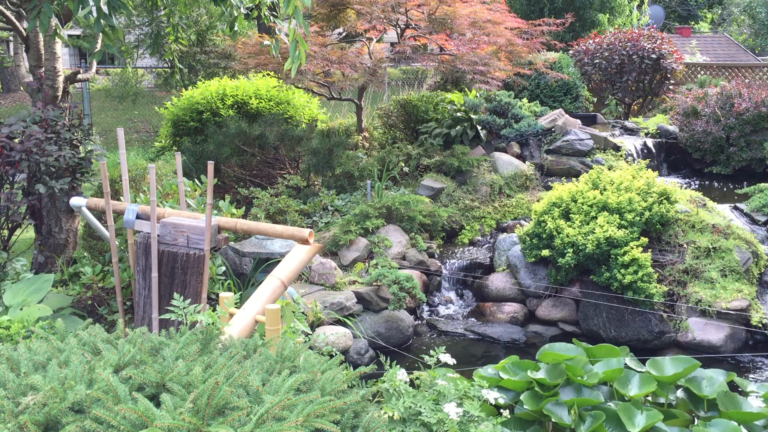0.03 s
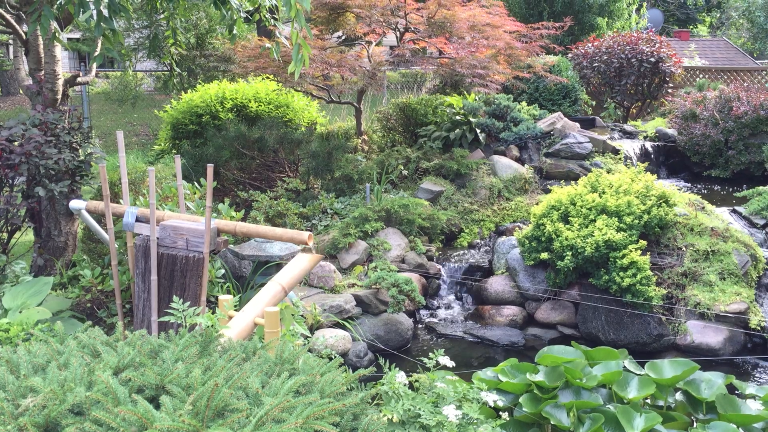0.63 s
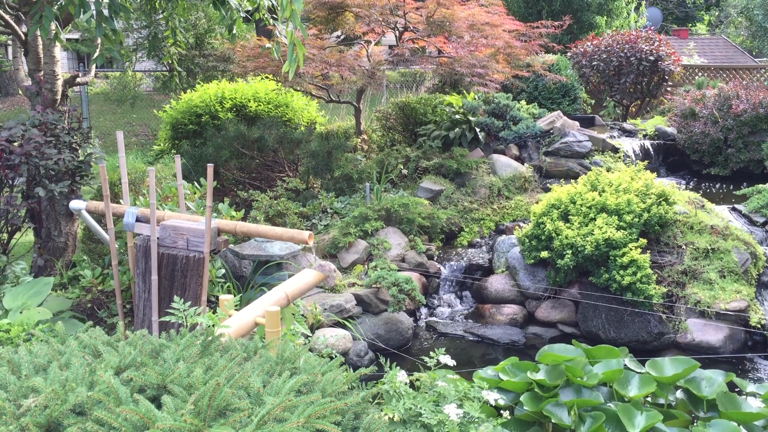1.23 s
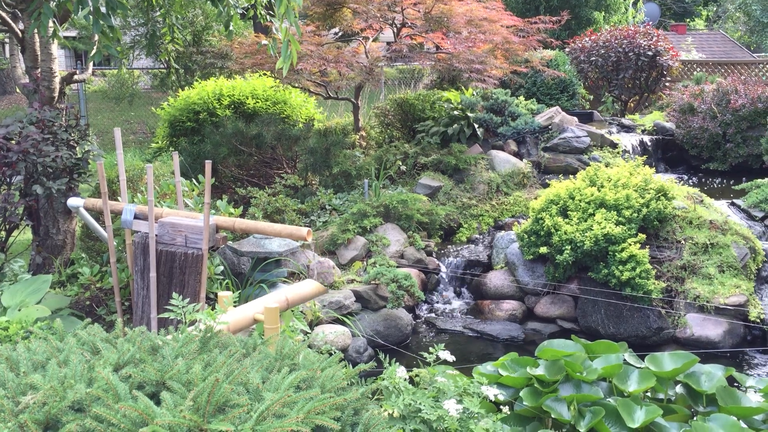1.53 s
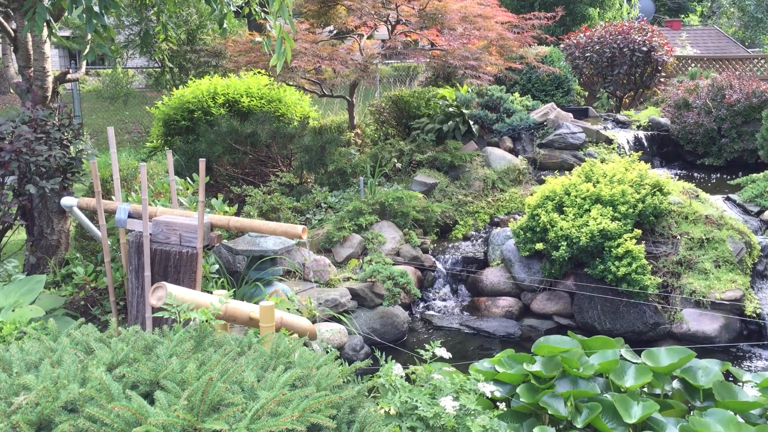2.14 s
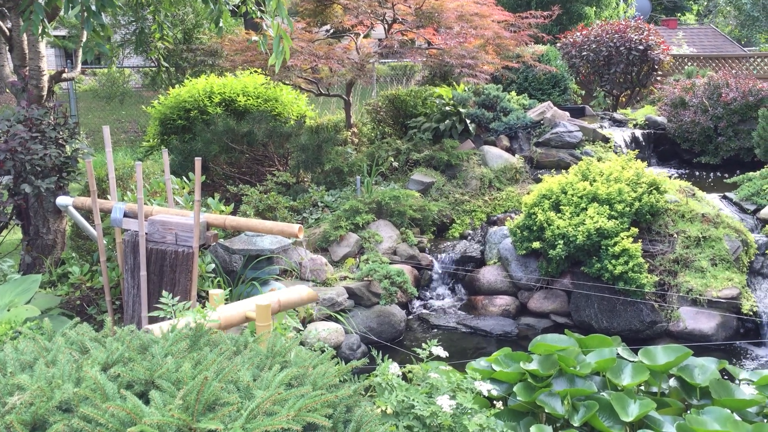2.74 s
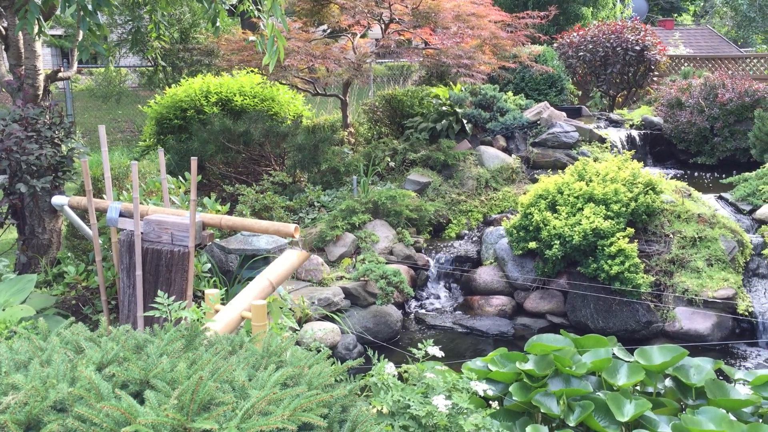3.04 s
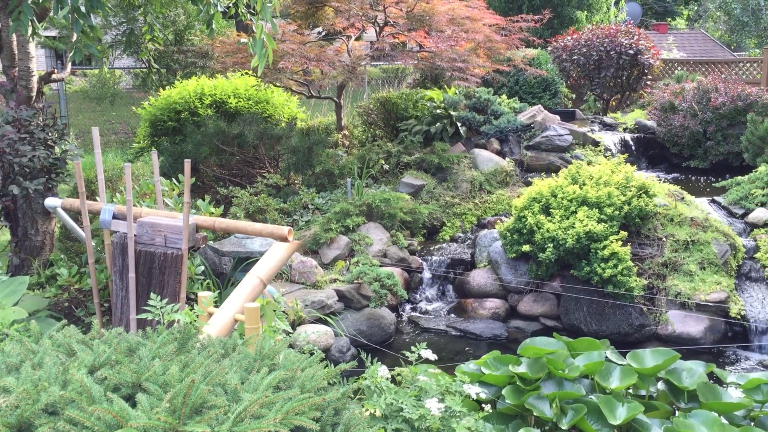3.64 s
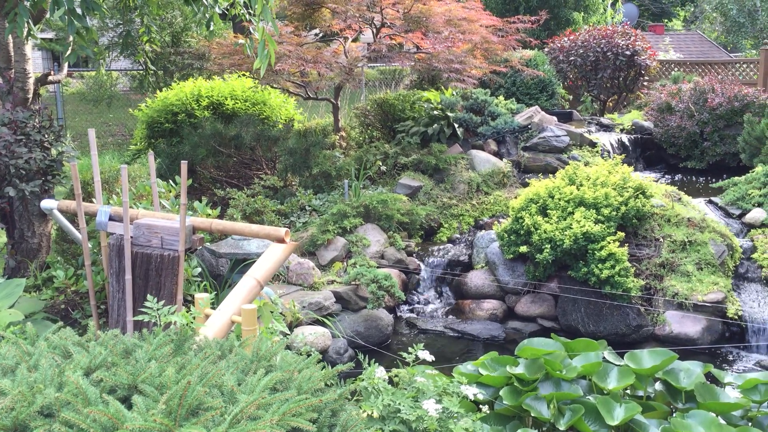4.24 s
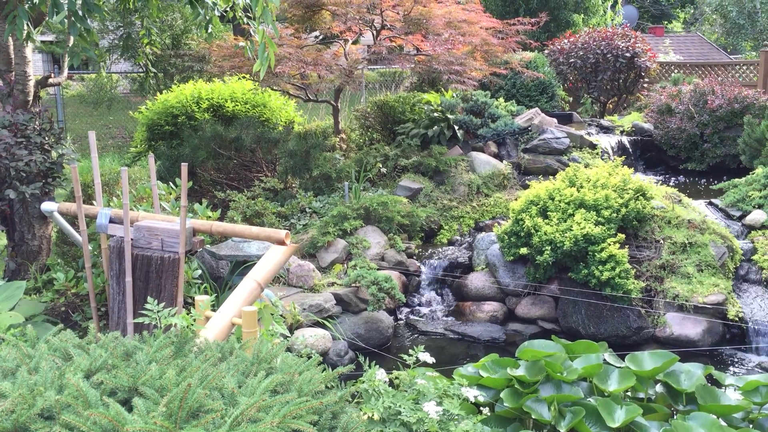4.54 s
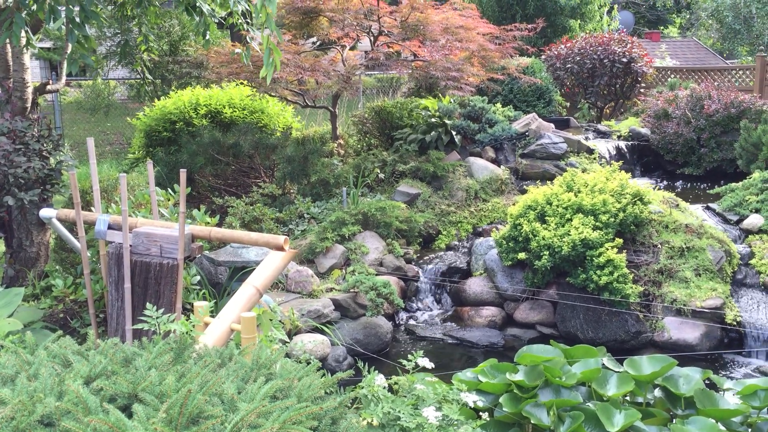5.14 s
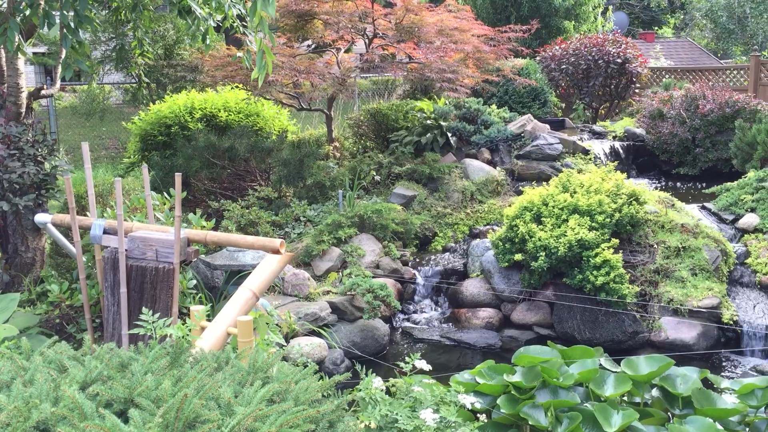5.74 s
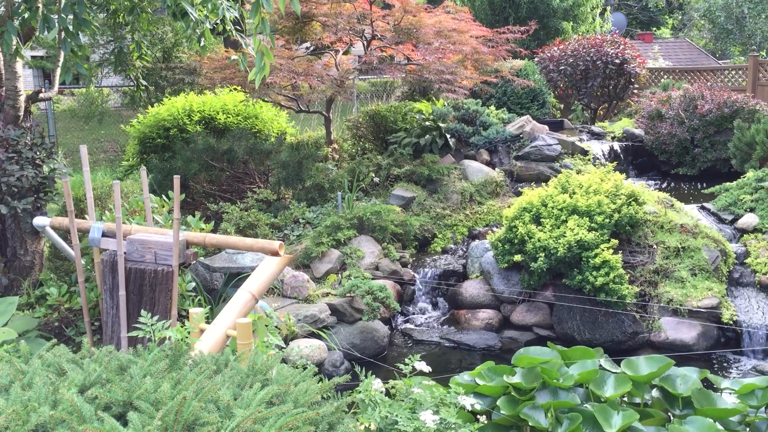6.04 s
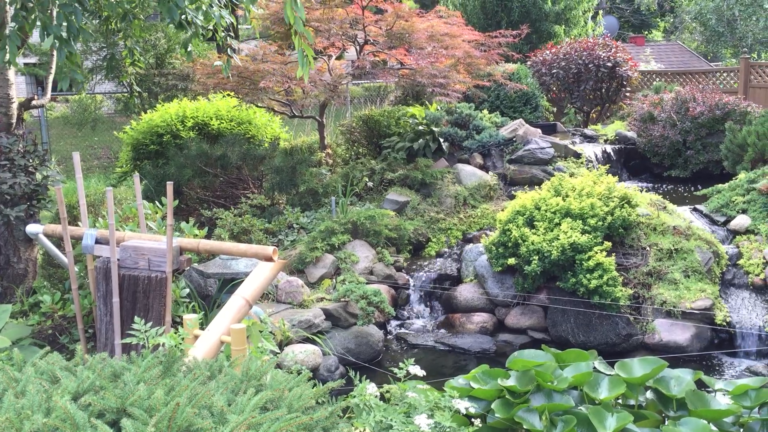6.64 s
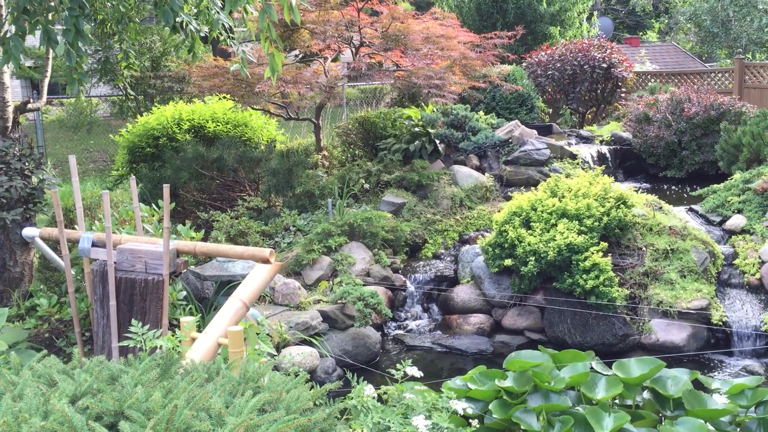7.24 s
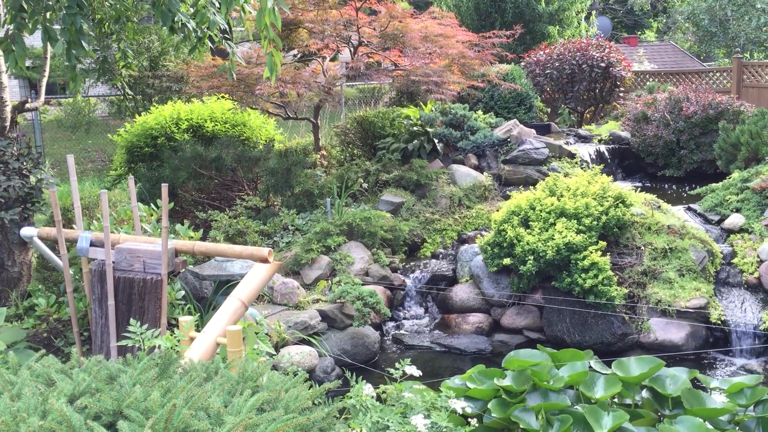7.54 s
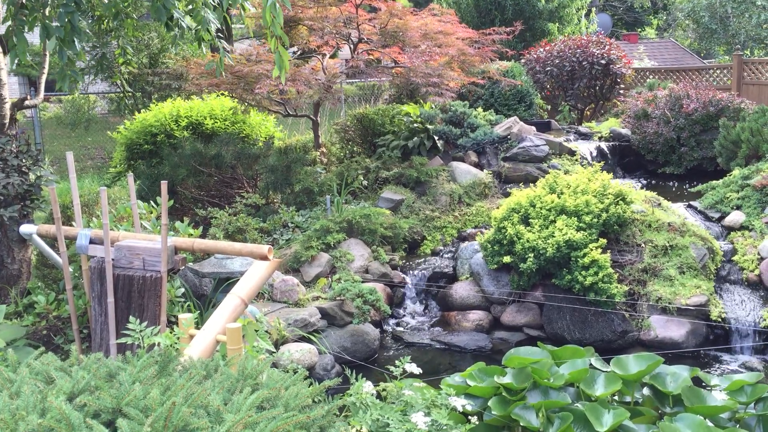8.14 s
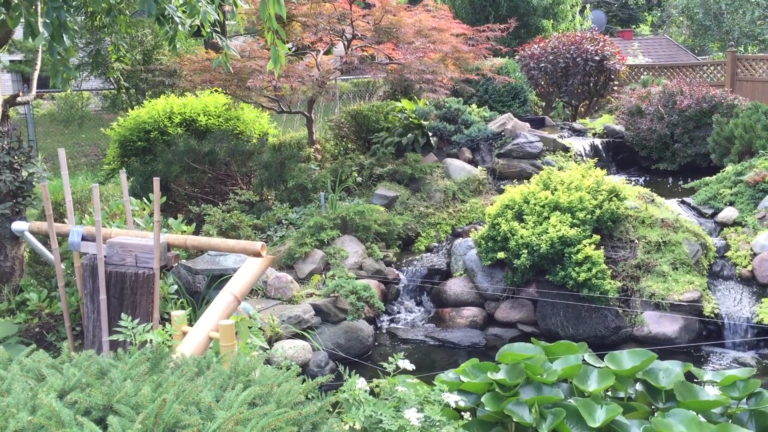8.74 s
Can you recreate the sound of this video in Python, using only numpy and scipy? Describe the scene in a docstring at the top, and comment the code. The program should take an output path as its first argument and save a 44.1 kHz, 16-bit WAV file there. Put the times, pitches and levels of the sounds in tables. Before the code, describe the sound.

A bamboo water tipper knocks sharply and bounces once, while cicadas buzz in pulses over a small garden waterfall.

```python
"""A small garden waterfall rushes and bubbles throughout, over the drone of a distant engine.
From the start cicadas buzz in the trees in pulsing phrases, each ending in a drawn-out whine.
At 3.25 s a bamboo water tipper knocks on its rest; it bounces once, 0.5 s later, with faint echoes
from rocks and fence. Meanwhile a far vehicle pulls away. From about 6.5 s a thin insect trill swells."""
import sys
import numpy as np
from scipy import signal
from scipy.fft import rfft, irfft
from scipy.io import wavfile

SR = 44100
rng = np.random.default_rng(int(sys.argv[2]) if len(sys.argv) > 2 else 0)


def to_wav(sig):
    """Store sig (one row per channel, or 1-D mono) as 16-bit WAV at the path in sys.argv[1].

    Samples outside -1..1 are clipped; the rate is SR.
    """
    pcm = np.clip(np.atleast_2d(sig), -1, 1) * 32767
    pcm = np.round(pcm).astype(np.int16)
    wavfile.write(sys.argv[1], SR, pcm.T)  # frames by channels


N = 396900
TIME = np.arange(N) / SR
# near cicada, buzz drops into whine: t/s, whine level/dB
NEAR_CICADA_PHRASES = [(0.53, -41), (1.465, -42), (2.383, -41), (3.29, -44.5), (4.181, -44), (5.085, -44.5),
                       (5.94, -45), (6.807, -45.5), (7.669, -42.5), (8.51, -46)]


def undb(db):
    """Decibels to gain."""
    return 10 ** (np.asarray(db) / 20)


def unit(x):
    """Scale to rms 1."""
    return x / np.sqrt(np.mean(x ** 2))


def colour(x, points):
    """Filter by a spectrum of (f/Hz, gain/dB) points."""
    hz, db = np.transpose(points)
    bins_hz = np.maximum(np.fft.rfftfreq(len(x), 1 / SR), 1)
    gain = undb(np.interp(np.log(bins_hz), np.log(hz), db))
    return irfft(rfft(x) * gain, len(x))


def walk(rate_hz):
    """Smooth random signal, rms 1, bandwidth about rate_hz."""
    lowpass = np.exp(-(np.fft.rfftfreq(N, 1 / SR) / rate_hz) ** 2)
    return unit(irfft(rfft(rng.standard_normal(N)) * lowpass, N))


def fade(t, t60_s):
    """Exponential decay, 60 dB in t60_s."""
    return np.exp(-np.log(1000) * t / t60_s)


def add(out, at_s, sound):
    """Mix sound into out at at_s."""
    i = max(int(at_s * SR), 0)
    out[i:i + len(sound)] += sound[:max(N - i, 0)]


def tone(hz, width_hz, rough):
    """Partial of rms 1; its rough share is smeared into a narrow band."""
    phase = 2 * np.pi * np.cumsum(hz * np.ones(N)) / SR
    in_phase = 1 - rough + rough * walk(width_hz)
    quadrature = rough * walk(width_hz)
    return unit(in_phase * np.sin(phase) + quadrature * np.cos(phase))


def tipper(crack_db=-7, attack_s=.0012):
    """Each blow rings the bamboo once and cracks at every touch of its chatter; a slower blow is duller."""
    # blows on the rest: t/s, level/dB, contact cut-off/Hz
    knocks = [(3.2549, -11, 4500), (3.7570, -23.5, 1000)]
    # touches within a blow: delay/s, level/dB
    contacts = [(0, -4), (.0034, 2.5), (0.0094, -5), (.0140, -9)]
    # modes of tube and air column: f/Hz, level/dB, t60/s
    tube_modes = [(250, -15, .025), (391, -18.5, .28), (570, -3.5, .036), (609, -13, .26), (700, -6, .022),
                  (790, -2, .025), (865, -2, .022), (960, -5, .028), (1150, -11, .035), (1218, -4, .058),
                  (1715, -3.5, .04), (2070, -14, .035), (2290, -10, .03), (2540, -13, .03),
                  (3830, -16, .03), (6100, -14, .02)]
    # contact crack: f/Hz, level/dB
    crack_spectrum = [(120, -34), (250, -15), (450, -20), (850, 4), (1400, -4), (2400, -3), (3200, -11),
                      (6200, -11), (9000, -17), (15000, -17)]
    out, t = np.zeros(N), TIME[:SR // 2]
    # neighbouring modes oppose each other, so the knock builds over a few ms
    ring = sum((-1) ** k * undb(db) * np.sin(2 * np.pi * hz * t) * fade(t, t60_s)
               for k, (hz, db, t60_s) in enumerate(tube_modes))
    chatter = sum(undb(db) * (t >= delay_s) * fade(np.abs(t - delay_s), .021) for delay_s, db in contacts)
    for at_s, db, cutoff_hz in knocks:
        crack = unit(colour(rng.standard_normal(len(t)), crack_spectrum)) * chatter
        blow = (ring + undb(crack_db) * crack) * (1 - np.exp(-t / attack_s))
        add(out, at_s, undb(db) * signal.lfilter(*signal.butter(1, cutoff_hz, fs=SR), blow))
    return garden(out, wet_db=-15.5, t60_s=.29, fence_s=.054, fence_db=-24)


def bubble(hz, cycles, glide):
    """A ringing air pocket; its pitch rises as it nears the surface."""
    life_s = cycles / hz
    t = TIME[:int(life_s * SR) + 2]
    phase = 2 * np.pi * hz * t * (1 + glide * t / life_s / 2)
    return np.sin(phase) * fade(t, life_s) * (1 - np.exp(-t * hz))


def babble(count, low_hz, high_hz, cycles, spread_db):
    """Swarm of bubbles of all sizes, a few much louder than the rest."""
    out = np.zeros(N)
    for when, pitch, loud, life in rng.random((count, 4)):
        hz = low_hz * (high_hz / low_hz) ** pitch
        gain = undb(-spread_db * np.log(1 - .985 * loud)) * hz / low_hz
        add(out, when * N / SR, gain * bubble(hz, cycles * (.5 + life), glide=.11))
    return unit(out)


def waterfall(rush_db=-46, babble_db=-48, spray_db=-64, spray_db_per_s=.3, drop_trim_db=-5.5):
    """Rushing water, bubbles in the pool below, spurts of spray ticking on the stones."""
    # falling water: f/Hz, level/dB
    water_spectrum = [(110, 0.5), (170, 0.5), (260, 2.5), (340, -5), (430, -10.5), (520, -9.5), (650, -1),
                      (950, -7), (1250, -1.5), (1700, -6), (2250, -6.5), (2800, -4), (10000, -16),
                      (15500, -24.5)]
    # loudest pool bubbles: t/s, level/dB, f/Hz
    plops = [(0.593, -32, 2270), (1.733, -28, 1200), (2.185, -29, 1420), (2.368, -32, 646),
             (2.583, -30, 1230), (4.761, -25, 2256), (5.442, -28, 1480), (6.446, -30, 2220),
             (8.162, -32.5, 936)]
    # loudest drops on stone: t/s, level/dB
    stone_drops = [(3.8271, -28), (4.1089, -27), (7.5656, -32), (8.1872, -31), (8.2835, -34), (8.8936, -31)]
    rush = unit(colour(rng.standard_normal(N), water_spectrum)) * undb(.9 * walk(17))
    pool = babble(count=7000, low_hz=190, high_hz=2587, cycles=24.5, spread_db=2.5)
    pool = unit(colour(pool, water_spectrum))
    ticks = babble(count=3600, low_hz=7000, high_hz=15500, cycles=16, spread_db=1.9)
    ticks = colour(ticks, [(7000, -3), (10000, -5), (12000, 0), (15000, -7)])
    spray = unit(ticks * undb(2 * walk(18)))
    splash = undb(babble_db) * pool + undb(spray_db + spray_db_per_s * TIME) * spray
    for at_s, db, hz in plops:
        add(splash, at_s, undb(db) * bubble(hz, cycles=36, glide=.071))
    for at_s, db in stone_drops:
        slap = np.diff(rng.standard_normal(SR // 100 + 1)) / 2
        add(splash, at_s, undb(db + drop_trim_db) * slap * fade(TIME[:len(slap)], .0084))
    return undb(rush_db) * rush + garden(splash, wet_db=-10, t60_s=.11, fence_s=.049, fence_db=-23)


def cicada_chorus(start_db=-37.7, rise_db_per_s=.09, flicker_db=.5, wander_db=.2):
    """Many far cicadas blur into a sizzling band; two groups flicker independently."""
    # chorus band: f/Hz, level/dB
    chorus_spectrum = [(2750, -28.5), (3100, -4.5), (3500, -2), (3900, 0.5), (4100, 0), (4450, 1.5),
                       (4950, -2), (5550, -1.5), (6200, -6), (7000, -13), (7600, -16), (7800, -14),
                       (8300, -21), (10300, -33)]
    groups = sum(colour(rng.standard_normal(N), chorus_spectrum) * undb(flicker_db * walk(21))
                 for _ in range(2))
    # swells into each near whine, slackens, recovers
    swell_db = sum(np.interp(TIME - at_s, [-.13, 0, .16, .28], [0, 1.3, -.9, 0])
                   for at_s, _ in NEAR_CICADA_PHRASES)
    return unit(groups) * undb(start_db + rise_db_per_s * TIME + swell_db + wander_db * walk(4))


def near_buzz(level_db=-43, upper_hz=4600, lower_hz=3890, lower_db=-6, sag_hz=280):
    """Before each whine the near cicada's buzz swells in two body resonances, then sags and dies down."""
    effort, sag = np.zeros(N), np.zeros(N)
    for at_s, _ in NEAR_CICADA_PHRASES:
        effort += np.interp(TIME - at_s, [-.64, -.63, -.0062, .11], [.013, .28, .86, .0057])
        sag += np.interp(TIME - at_s, [-.04, .05, .2], [0, 1, 0])
    upper = tone(upper_hz - sag_hz * sag, width_hz=95, rough=1)
    lower = tone(lower_hz - sag_hz * sag, width_hz=100, rough=1)
    return undb(level_db) * effort * (upper + undb(lower_db) * lower)


def whine(phrases, partials, length_s, rough, upper_db=0, pitch=1):
    """Tymbals fall into an even beat: clean partials stand out in turn and linger."""
    out, rows = np.zeros(N), np.array(phrases)
    nearest = np.searchsorted((rows[1:, 0] + rows[:-1, 0]) / 2, TIME)
    at_s, db = rows[nearest].T
    progress = (TIME - at_s) / length_s
    for k, (hz, partial_db, entry, end) in enumerate(partials):
        arc = np.clip((progress - entry) / (end - entry), 0, 1)
        swell = np.sqrt(np.abs(np.sin(np.pi * arc ** .5)))
        gain = undb(db + partial_db + upper_db * (k > 0))
        out += gain * swell * tone(hz * pitch, width_hz=21, rough=rough)
    return out


def near_whine(shrink_s_per_s=.009, upper_db_per_s=.55):
    """As the near cicada sings on, its whines get shorter, brighter and slightly higher."""
    # whine partials: f/Hz, level/dB, entry/length, end/length
    near_partials = [(3438, -1, .07, 1), (3608, -11, .1, 1), (3978, -1, .14, 1), (4160, -1.5, .05, .9),
                     (4328, -1, -.08, .5), (5058, -9, .1, .75), (5412, -5.5, .05, .65),
                     (5768, -8.5, .05, .55)]
    length_s = .265 - shrink_s_per_s * TIME
    upper_db = -1 + upper_db_per_s * TIME
    creep = np.interp(TIME, [2.5, 5.5], [1, 1.007])
    return whine(NEAR_CICADA_PHRASES, near_partials, length_s, rough=.18, upper_db=upper_db, pitch=creep)


def far_whine():
    """A lower cicada, further off, whines at its own pace."""
    # whines: t/s, level/dB
    far_phrases = [(-.02, -48), (1.14, -43.5), (2.31, -46), (3.57, -47.5), (5.18, -50.5)]
    # whine partials: f/Hz, level/dB, entry/length, end/length
    far_partials = [(2921, -4.5, .35, 1), (3070, -1, .1, .7), (3150, -6, .6, 1.1), (3342, -1, .05, .65)]
    return whine(far_phrases, far_partials, length_s=.23, rough=.3)


def insect_trill(trill_hz=5560, octave_db=-16, sizzle_db=-4):
    """Thin, narrow rasp with its octave and a wide sizzle."""
    # trill loudness: t/s, level/dB
    trill_levels = [(0, -78), (6.4, -72), (6.8, -53), (7.15, -64), (7.6, -48), (8, -45), (8.25, -55),
                    (8.55, -48), (9, -44)]
    level_db = np.interp(TIME, *np.transpose(trill_levels))
    sizzle = unit(colour(rng.standard_normal(N), [(4000, -32), (5800, 7), (9000, -5), (15000, -21)]))
    rasp = tone(trill_hz, width_hz=140, rough=1)
    octave = tone(2 * trill_hz, width_hz=650, rough=1)
    return undb(level_db) * (rasp + undb(octave_db) * octave + undb(sizzle_db) * sizzle)


def engine(lines_db=-3, rumble_db=-4, wander_db=1.3):
    """Only wavering low lines and a rumble carry this far; they fade and return on the way."""
    # engine lines: f/Hz, level/dB
    engine_lines = [(76, 0.5), (94, -6.5), (119, -11.5), (154, -10.5), (205, -11)]
    # rumble: f/Hz, level/dB
    rumble_spectrum = [(20, -34), (35, -41), (55, 8.5), (78, 9.5), (100, 8.5), (140, 4.5), (220, -49)]
    # engine loudness: t/s, level/dB
    engine_levels = [(0, -49), (2.2, -50), (3.2, -52), (4.7, -49), (6.2, -48), (9, -49)]
    speed = 1 + .00806 * walk(.596)
    lines = sum(undb(db) * tone(hz * speed, width_hz=4.9, rough=.36) for hz, db in engine_lines)
    rumble = unit(colour(rng.standard_normal(N), rumble_spectrum))
    level_db = np.interp(TIME, *np.transpose(engine_levels)) + wander_db * walk(9)
    return undb(level_db) * (undb(lines_db) * lines + undb(rumble_db) * rumble)


def vehicle():
    """A faint motor note climbs as a distant vehicle pulls away."""
    # motor note: t/s, f/Hz, level/dB
    motor_track = [(3, 269, -80), (3.5, 278.7, -59), (4.3, 292, -59), (5, 298, -66), (5.6, 302, -80)]
    at_s, hz, db = np.transpose(motor_track)
    return undb(np.interp(TIME, at_s, db)) * tone(np.interp(TIME, at_s, hz), width_hz=3.2, rough=.42)


def garden(x, wet_db, t60_s, fence_s, fence_db):
    """Direct sound, scatter from rocks and shrubs, a later echo from the fence."""
    t = TIME[:SR // 2]
    scatter = colour(rng.standard_normal(len(t)), [(300, -5.5), (900, -2.5), (2500, -1.5), (9000, -6.5)])
    scatter *= fade(t, t60_s) * np.minimum(t / .0076, 1)
    out = x + undb(wet_db) * signal.fftconvolve(x, scatter / np.linalg.norm(scatter))[:N]
    add(out, fence_s, undb(fence_db) * x)
    return out


def scene():
    """All sources at one microphone."""
    whines = near_whine() + far_whine()
    mono = tipper() + waterfall() + cicada_chorus() + near_buzz() + whines
    mono += insect_trill() + engine() + vehicle()
    return np.array([mono, mono])


def record(dry):
    """The microphone opens after a moment; it cuts deep bass, notches the treble and cuts the top."""
    open_s, low_hz, notch_hz, top_hz = .083, 38, 10400, 15680
    heard = signal.sosfilt(signal.butter(6, low_hz, "high", fs=SR, output="sos"), dry)
    heard -= .4 * signal.lfilter(*signal.iirpeak(notch_hz, 20, fs=SR), heard)
    heard *= np.clip((TIME - open_s) * SR / 64, 0, 1)
    return signal.sosfilt(signal.ellip(10, .1, 70, top_hz, fs=SR, output="sos"), heard)


dry = scene()
out = record(dry)
to_wav(out)
```